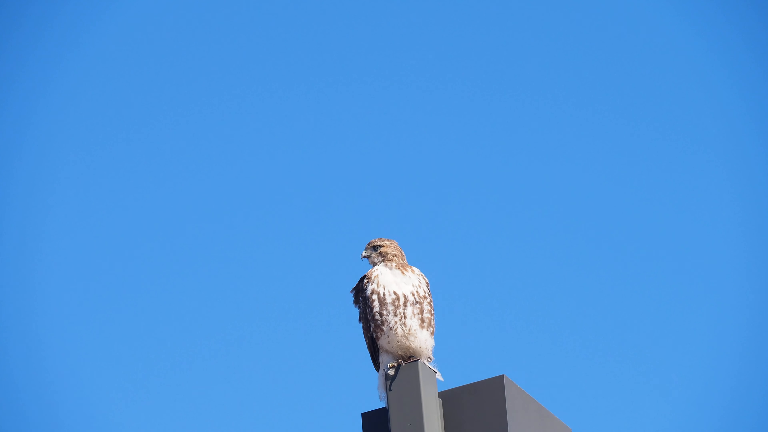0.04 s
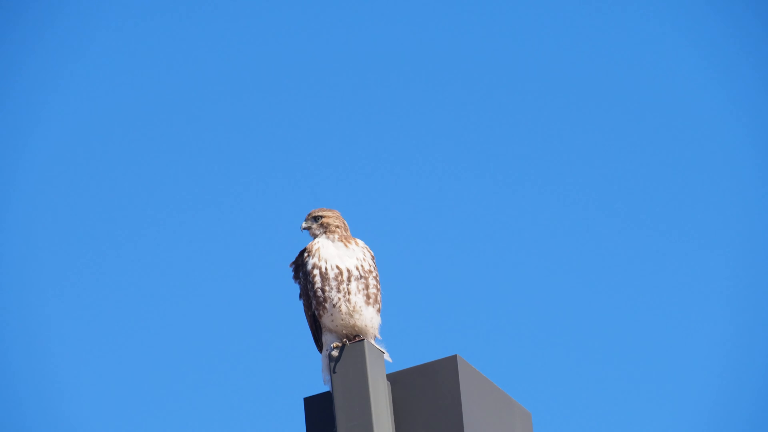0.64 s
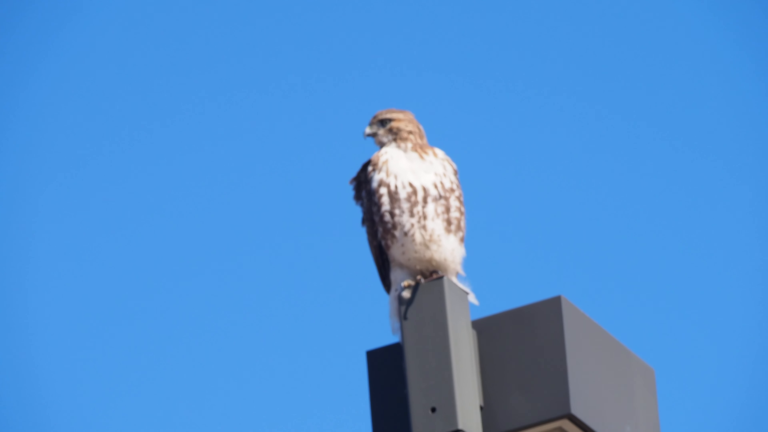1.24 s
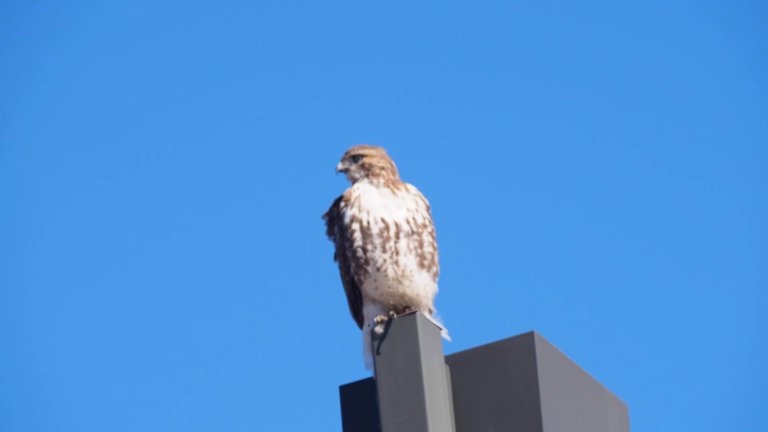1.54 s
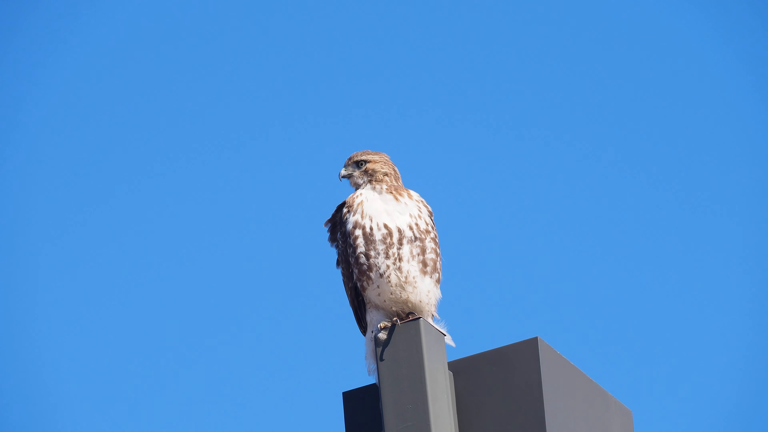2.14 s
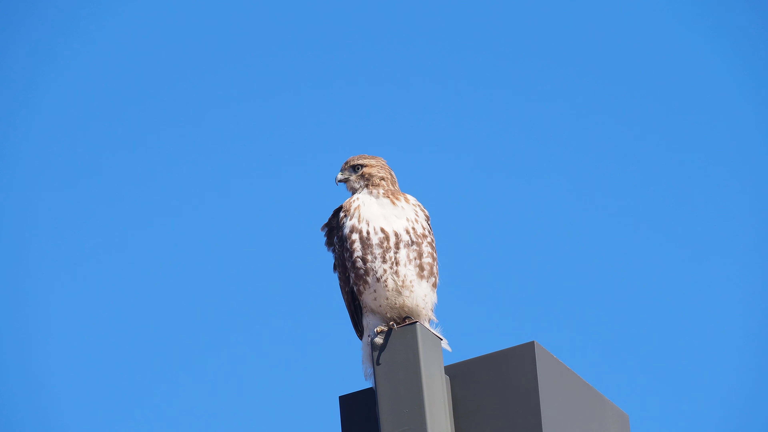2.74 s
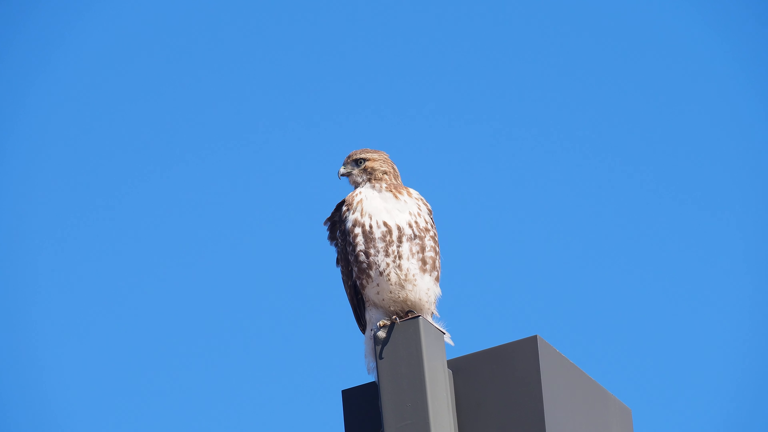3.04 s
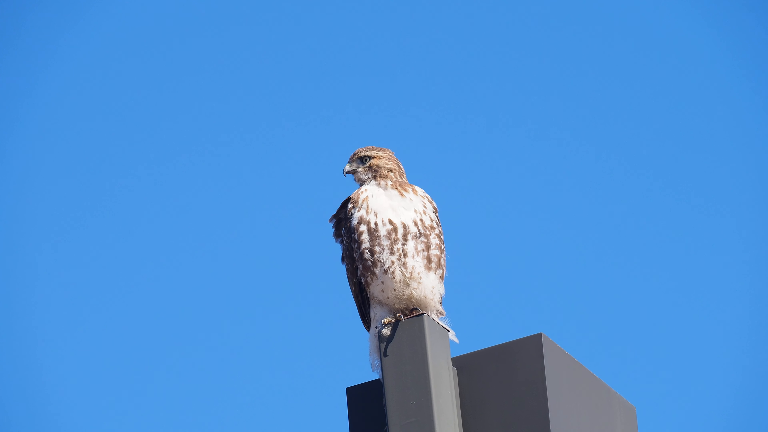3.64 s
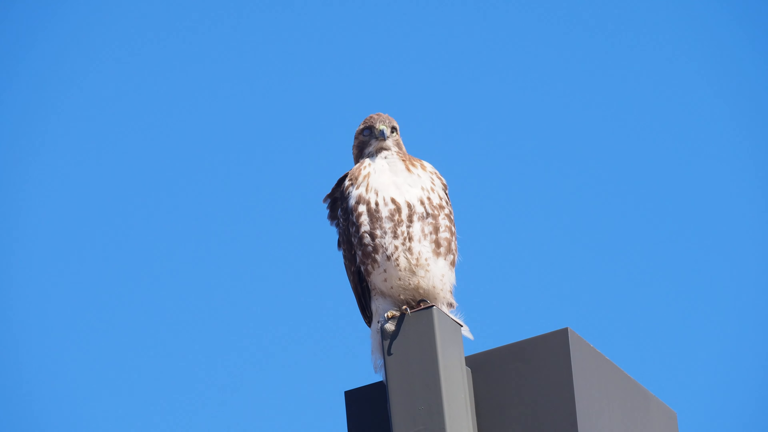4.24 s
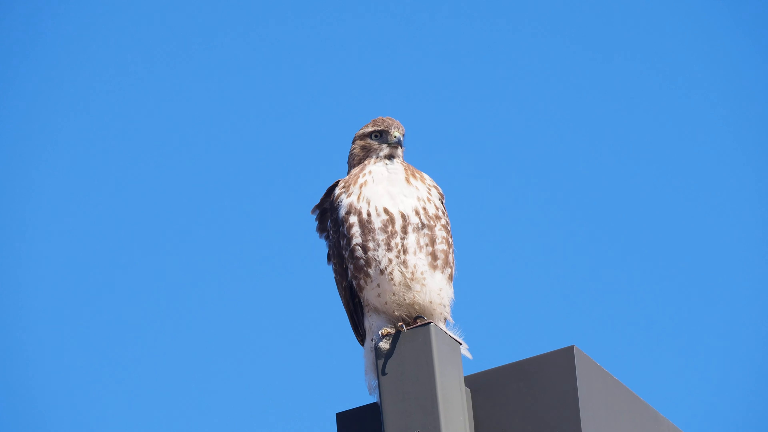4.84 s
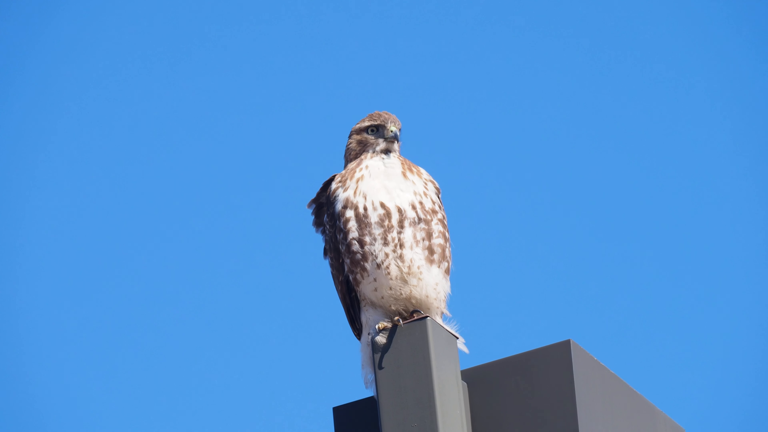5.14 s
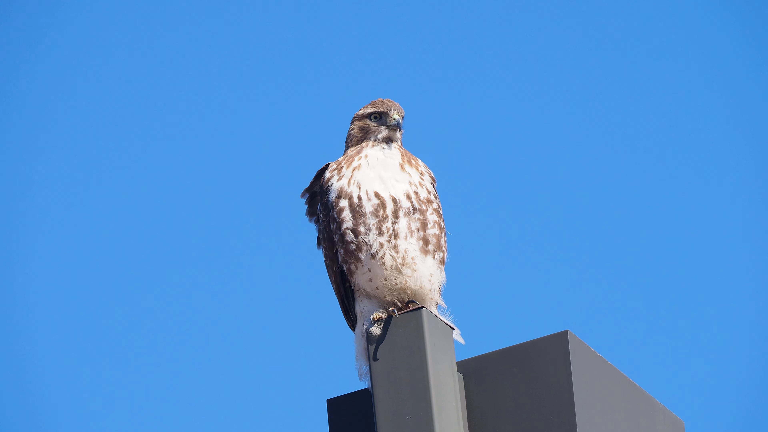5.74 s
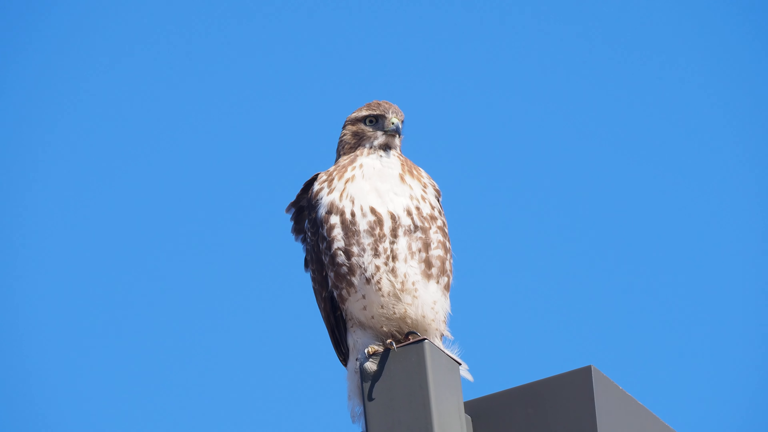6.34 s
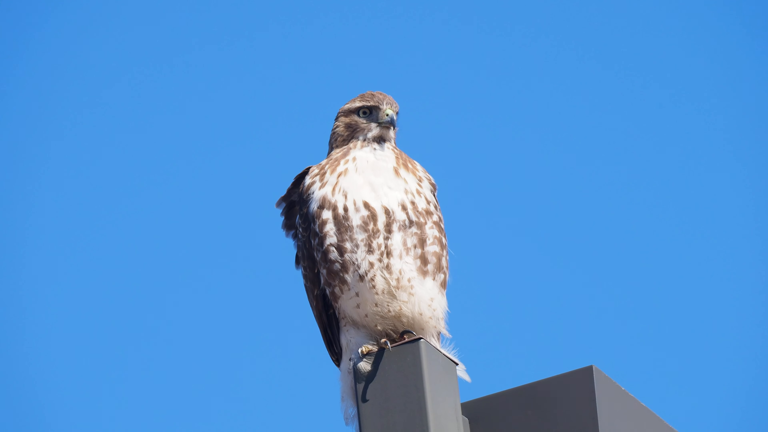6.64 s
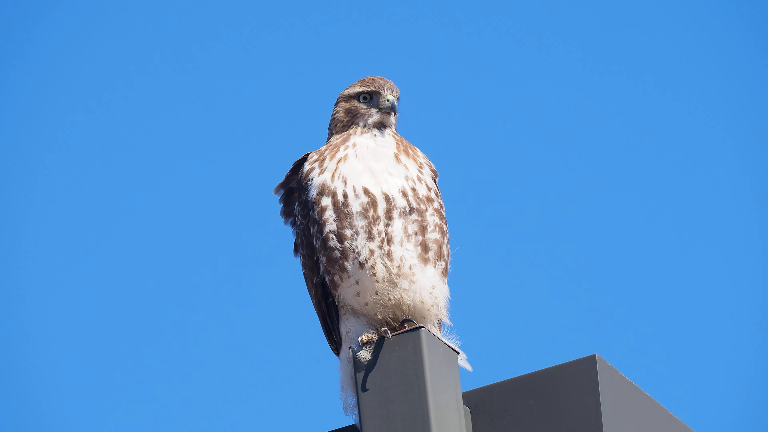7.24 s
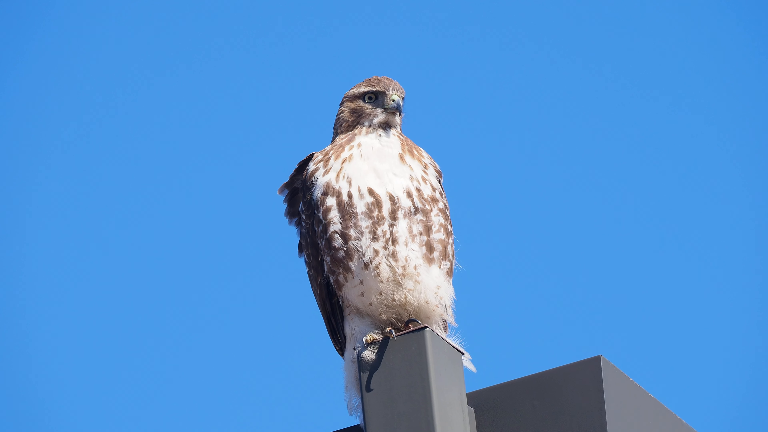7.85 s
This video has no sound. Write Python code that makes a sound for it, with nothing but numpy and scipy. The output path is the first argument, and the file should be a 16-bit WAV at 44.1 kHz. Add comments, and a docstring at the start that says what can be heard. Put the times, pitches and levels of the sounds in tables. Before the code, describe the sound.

Outdoors, wind rumbles and thumps on a camera microphone, mostly on the left. Up close, a zoom barrel slides, clicks and rubs to rest. A hawk some way off to the right gives a raspy yelp that runs into a long, sinking whistle. A small bird twitters faintly on the left, the barrel slides again, and the hawk screams a second time. Far traffic murmurs underneath.

```python
"""Outdoors, far from traffic, wind buffets a camera's stereo microphone, mostly the left port.
First, right at the microphone, the zoom barrel slides, the body clicks and the barrel rubs to rest.
Then a hawk screams from a pole some way off: a rising yelp breaks into a rasp, then a long, sinking
whistle from two membranes. A songbird twitters to the left, the barrel slides again, and a faint
tone comes and goes. Last, the hawk screams a second time."""
import sys
import numpy as np
from scipy import signal
from scipy.fft import rfft, irfft
from scipy.io import wavfile
from scipy.ndimage import uniform_filter1d

SR = 44100
rng = np.random.default_rng(int(sys.argv[2]) if len(sys.argv) > 2 else 0)


def file_out(sig):
    """Save sig as 16-bit WAV at sys.argv[1]."""
    # one column per channel
    cols = np.atleast_2d(sig).T
    # limit, then scale
    lim = np.clip(cols, -1, 1)
    pcm = np.round(lim * 32767).astype(np.int16)
    wavfile.write(sys.argv[1], SR, pcm)


N = 357210
T = np.arange(N) / SR
FREQS = np.maximum(np.arange(N // 2 + 1) * SR / N, 1)


# The yelps that open the screams: start_s, length_s, level_db
YELPS = [(1.782, .205, -53), (7.108, .125, -55)]
# The held notes, one list a scream:
# time_s, pitch_hz, level_db (before gain_db), throat_hz, second_depth, second_pitch_ratio, roughness
HELD_NOTES = [
    [(1.92, 1500, -64, 2800, .8, .5, .4), (2.0, 1528, -54.3, 2250, 1.3, .5, .22),
     (2.07, 1518, -54.8, 2250, 1.2, .5, .13), (2.15, 1485, -56.3, 2400, 1, .5, .17),
     (2.23, 1415, -57, 2600, .6, .5, .26), (2.31, 1372, -56.8, 2750, .65, .5, .2),
     (2.44, 1378, -60, 3550, .5, .5, .12), (2.49, 1372, -59, 3650, .45, .42, .15),
     (2.62, 1348, -58, 3600, .42, .38, .12), (2.78, 1372, -57.5, 3400, .15, .36, .1),
     (2.93, 1342, -59.5, 3200, .08, .36, .1), (3.0, 1255, -61, 2950, .08, .36, .14),
     (3.07, 1215, -59.5, 2650, .08, .36, .2), (3.13, 1140, -63, 2300, .08, .36, .45)],
    [(7.21, 1545, -58, 2300, 1.2, .5, .45), (7.29, 1535, -54.3, 2300, 1, .5, .2),
     (7.38, 1482, -57.3, 2450, .9, .5, .14), (7.47, 1495, -56, 2700, .5, .5, .18),
     (7.56, 1415, -56, 3450, 1.2, .5, .16), (7.68, 1382, -55.3, 3150, .7, .5, .13),
     (7.73, 1397, -59, 3400, .15, .45, .2), (7.79, 1388, -54.8, 3250, .2, .38, .12),
     (7.87, 1368, -58, 3550, .35, .37, .12), (7.97, 1362, -56.7, 3350, .35, .35, .14),
     (8.1, 1375, -58.5, 3300, .12, .35, .12), (8.2, 1365, -59, 3200, .1, .35, .12)],
]
# The camera body's shadow on the port facing away from the hawk: frequency_hz, gain_db
HAWK_SHADE = [(2200, -3), (3000, -3.5), (4000, -6), (5200, -18.5), (9000, -11.5)]

def hawk():
    """On a pole some way off to the right: each scream is a yelp that runs into a held note."""
    screams = sum(yelp(*row) for row in YELPS) + sum(whistle(note) for note in HELD_NOTES)
    return outdoors(screams, "right", lag_s=.000122, shade=HAWK_SHADE, wet_db=-13, decay_s=.5)


# The hawk's wide-open throat in the yelp: frequency_hz, gain_db
YELP_THROAT = [(1000, -24), (1650, -19), (2000, -2), (2300, -4), (2750, -14), (3200, -6), (3700, -2.5),
               (4200, -1.5), (4700, -16), (5150, -9.5), (5500, -16), (6100, -29), (7400, -20), (8200, -25),
               (8750, -13), (9600, -27), (15000, -31)]

def yelp(start_s, length_s, level_db, start_hz=965, top_hz=1075, rasp_hz=990, break_s=.052):
    """A clear note climbs, then breaks into a period-doubled rasp that darkens as the throat closes."""
    source, out = np.zeros((2, N))
    i, t, envelope = span(start_s, length_s + .03, attack_s=.016, release_s=.03)
    climb = np.minimum(t / break_s, 1)
    broken = ramp(t, break_s, break_s + .015)
    hz = (1 - broken) * (start_hz + (top_hz - start_hz) * climb) + broken * rasp_hz
    hz *= 1 + (.013 + .015 * broken) * walk(50)[i]
    roughness = .9 * np.maximum(broken, .4 * climb)
    phase = membrane_phase(hz, roughness, jitter=.06)
    harmonic = np.arange(1, 27)[:, None] / 2
    darkening = undb(-11 * broken * (harmonic > 4) - 7 * (t / length_s) ** 2 * (harmonic > 3.5))
    doubling = np.where(harmonic % 1, broken * undb(-5), 1)  # odd halves sound only in the rasp
    beak_opening = np.where(harmonic > 2, ramp(t, 0, .03), 1)
    partials = darkening * doubling * beak_opening * np.sin(harmonic * phase)
    source[i] = partials.sum(0) * (1 + .7 * roughness * walk(260)[i])
    tiring_db = -.5 - 28 * (t - break_s) + 1.2 * walk(45)[i]
    out[i] = unit(colour(source, YELP_THROAT)[i]) * envelope * undb(level_db + broken * tiring_db)
    return out


# The hawk's beak and throat in the held note: frequency_hz, gain_db
BEAK = [(900, -25), (1400, -3), (2000, 4), (2300, 7), (2800, 7), (3400, 5), (4150, 4.5), (4550, -10),
        (4950, 2), (5400, -1), (6500, -18), (8800, -6), (15000, -35)]

def whistle(note, throat_width_hz=740, gain_db=-1):
    """One membrane sinks as its strain eases; a second, an octave below, adds sidebands, then slips."""
    out = np.zeros(N)
    start_s, end_s = note[0][0], note[-1][0]
    i, _, envelope = span(start_s, end_s - start_s, attack_s=.025, release_s=.035)
    hz, level_db, throat_hz, depth, ratio, roughness = curves(note, T[i])
    hz *= 1 + .005 * walk(45)[i] + .002 * walk(12)[i]
    throat_hz += 80 * walk(18)[i]  # the throat wavers, favouring one partial or another
    depth *= undb(1.3 * walk(25)[i])
    phase = membrane_phase(hz, roughness, jitter=.07)
    second_phase = 2 * np.pi * np.cumsum(ratio * hz) / SR
    slipped = 1 - ramp(ratio, .42, .5)
    harmonic = np.arange(1, 7)[:, None]
    upper = depth * np.select([harmonic == 1, harmonic == 2], [1.05, .8], .22)
    lower = depth * .8 * slipped * np.where(harmonic == 3, 1, .3)
    voice, power = 0, 0
    for side, weight in ((0, 1), (1, upper), (-1, lower)):
        partial_hz = harmonic * hz + side * ratio * hz
        throat = 1 / np.hypot(1, (partial_hz - throat_hz) / throat_width_hz)
        gain = weight * gain_at(BEAK, partial_hz) * throat
        voice += (gain * np.sin(harmonic * phase + side * second_phase)).sum(0)
        power += (gain ** 2).sum(0) / 2
    hoarseness = (1 + 1.2 * roughness * walk(300)[i]) * undb(1.3 * walk(38)[i])
    out[i] = voice / np.sqrt(power) * unit(hoarseness) * envelope * undb(level_db + gain_db)
    return out


def membrane_phase(hz, roughness, jitter):
    """Phase of a membrane whose pitch scatters with roughness."""
    shaken_hz = hz * (1 + jitter * roughness * walk(420)[:len(hz)])
    return 2 * np.pi * np.cumsum(shaken_hz) / SR


# Gusts on the microphone's exposed left port and sheltered right port: time_s, level_db
WIND_LEFT = [(0.0, -24), (1.05, -15), (1.5, -21.0), (1.6, -17.5), (1.8, -19.5), (2.25, -10.5), (2.3, -14.5),
             (2.75, -14.5), (2.9, -18.5), (2.95, -13.5), (3.55, -19.5), (3.8, -15.5), (4.0, -18.5),
             (4.5, -22.5), (4.95, -17.5), (5.25, -18), (5.8, -16), (6.2, -29), (6.3, -22.5), (6.45, -28),
             (6.75, -25), (8.1, -23.5)]
WIND_RIGHT = [(0.0, -36), (1.6, -32), (1.9, -17.5), (2.2, -27.5), (2.3, -34), (4.1, -32), (5.5, -35.5),
              (8.1, -34)]

def wind():
    """Each microphone port has its own gusts and its own eddies."""
    gusts_db = [curves(gusts, T)[0] for gusts in (WIND_LEFT, WIND_RIGHT)]
    return np.array([turbulence(db) + stray_buffets(db) for db in gusts_db])


# Eddies at a port in a moderate gust: frequency_hz, density_db
EDDIES = [(12, -11.5), (25, 6), (55, 5), (100, 2.5), (170, -7.5), (250, -16), (380, -31), (550, -69.5),
          (800, -65), (1400, -70), (3000, -79.5)]

def turbulence(gust_db, moderate_db=-21, db_per_octave=22, flutter_db=3):
    """Faster air at a port is louder and its eddies are smaller, so the rumble reaches higher."""
    flutter = walk(31.1)
    coarse_t = T[::50]
    speed = 2 ** ((gust_db - moderate_db) / db_per_octave + .15 * flutter)[::50]
    spectrum = rfft(rng.standard_normal(N))
    rumble, power = 0, 0
    for hz in 16 * 2 ** (np.arange(15) / 2):  # half-octave bands
        window = np.cos(np.pi / 2 * np.clip(2 * np.log2(FREQS / hz), -1, 1)) ** 2
        gain = gain_at(EDDIES, hz / speed)
        rumble += irfft(spectrum * window, N) * np.interp(T, coarse_t, gain)
        power += gain ** 2 * hz * np.log(2) / SR
    return rumble / np.sqrt(np.interp(T, coarse_t, power)) * undb(gust_db + flutter_db * flutter)


def stray_buffets(gust_db, per_s=12, strong_db=-17, scatter_db=4):
    """Stray eddies strike a port at random, harder as the gust grows, up to a strong wind."""
    out, length = np.zeros(N), SR // 20
    for n, (offset, strength) in enumerate(rng.uniform(-1, 1, (200, 2))):
        at = int((n + 1 + offset) / per_s * SR)
        if at < N - length:
            peak_db = -20 + 3.4 * min(gust_db[at] - strong_db, 0) + scatter_db * strength
            out[at:at + length] += thump(centre_hz=230, rise_s=.0059) * undb(peak_db)
    return out


# Wind hits on the microphone: start_s, peak_db (before gain_db), left_minus_right_db, centre_hz
BUFFETS = [(0.737, -5, 34, 190), (1.043, -6.5, 38, 250), (1.049, -6.5, 40, 264), (1.064, -6.5, 28, 262),
           (1.134, -19.5, 35, 290), (1.184, -24.5, 28, 280), (1.22, -20, 28, 258), (1.246, -13.5, 34, 233),
           (1.398, -18.5, 28, 233), (1.604, -15.5, 31, 257), (1.719, -16.5, 13, 255),
           (1.903, -7.5, -11, 178), (1.946, -12.5, -33, 280), (2.068, -16.5, 26, 250),
           (2.131, -17, 25, 283), (2.349, -13, 23, 199), (2.517, -22.5, 27, 230), (2.748, -5, 38, 164),
           (2.76, -6.5, 40, 204), (2.958, -29, 34, 181), (3.083, -19, 29, 253), (3.681, -14.5, 29, 216),
           (3.776, -13, 38, 300), (3.924, -13.5, 28, 216), (4.927, -19, 28, 184), (4.966, -22.5, 28, 240),
           (5.68, -11.5, 31, 217), (5.762, -10.5, 33, 252), (6.672, -21.5, 18, 146), (6.729, -19, 23, 185),
           (6.911, -20, 22, 162), (7.086, -20, 22, 164), (7.137, -22.5, 27, 169), (7.217, -14, 27, 138),
           (7.251, -22.5, 21, 163), (7.302, -17, 24, 174), (7.435, -17, 25, 140), (7.57, -15, 26, 139),
           (7.598, -24, 23, 164), (7.707, -18.5, 20, 119), (7.909, -20.5, 20, 139), (7.971, -20.5, 18, 145)]

def hard_buffets(gain_db=4):
    """The hardest eddies, each mostly on one port."""
    out = np.zeros((2, N))
    for start_s, peak_db, pan_db, centre_hz in BUFFETS:
        i = int(start_s * SR) + np.arange(SR // 20)
        sides = pan(pan_db) / pan(pan_db).max()
        out[:, i] += sides * undb(peak_db + gain_db) * thump(centre_hz, rise_s=.0075)
    return out


# One eddy striking a port: multiple_of_centre, density_db
THUMP = [(.3, -6), (.75, 2), (1.25, 0), (2, -15), (3, -29), (4.4, -42), (8, -60), (20, -80)]

def thump(centre_hz, rise_s, raggedness=.4):
    """A tight eddy hits a port: a ragged thump of a few cycles, peak 1."""
    t = T[:SR // 20]
    hz = np.maximum(np.fft.rfftfreq(len(t), 1 / SR), 1)
    phase = 2 * np.pi * (rng.random() - hz * rise_s)
    phase += raggedness * np.cumsum(rng.standard_normal(len(hz)))
    pulse = irfft(gain_at(THUMP, hz / centre_hz) * np.exp(1j * phase), len(t))
    pulse *= ramp(t, 0, rise_s) * (1 - ramp(t, rise_s, 4 * rise_s))
    return pulse / abs(pulse).max()


# The hollow zoom barrel and its dust seal, beside the microphone: frequency_hz, density_db
BARREL = [(300, 5.5), (1000, 2), (1800, -0.5), (2300, 0.5), (3000, 0), (3300, 0), (4100, -8.5), (5400, -8),
          (6400, -20), (7400, -14), (8300, -26), (15000, -57)]
SEAL = [(1900, -9.5), (2700, 10), (3400, 6), (5400, 2.5), (6400, 0.5), (7300, 3.5), (8300, -1.5),
        (9000, 0.5), (10000, 3.5), (11300, -8), (13300, 1.5), (16000, -12)]
# Strokes of the barrel: start_s, length_s, attack_s, release_s, level_db, relative_hiss_db
SLIDES = [(-.05, 0.78, .05, 0.5, -58.5, -1), (0.035, 0.19, 0.12, 0.08, -53, 2),
          (0.256, 0.14, 0.04, 0.051, -60, 6.5), (0.483, 0.05, 0.0058, 0.013, -47.5, -9),
          (0.497, 0.27, .015, 0.35, -52.5, -9.5), (0.585, 0.39, 0.17, 0.15, -43, -12),
          (0.775, 0.14, 0.022, 0.087, -47, -8), (0.858, 0.29, 0.034, 0.14, -52.5, -16),
          (2.912, 0.75, 0.23, 0.38, -62.5, -27), (3.929, 0.554, 0.054, 0.13, -53, -12),
          (5.753, 0.44, 0.058, 0.48, -53.5, -18), (6.114, 0.7, 0.1, 0.57, -57.5, -15)]

def zoom_slides(seal_gain_db=-1, grain_db=2):
    """The barrel slides in tiny slips; its dust seal hisses on top."""
    barrel_level, seal_level = np.zeros((2, N))
    for start_s, length_s, attack_s, release_s, level_db, hiss_db in SLIDES:
        i, _, envelope = span(start_s, length_s, attack_s, release_s)
        barrel_level[i] = np.hypot(barrel_level[i], envelope * undb(level_db))
        seal_level[i] = np.hypot(seal_level[i], envelope * undb(level_db + hiss_db + seal_gain_db))
    slips = undb(grain_db * walk(300) + .7 * walk(27))
    barrel = barrel_level * stereo_noise(BARREL, alike=.23, alike_hz=2530)
    seal = seal_level * stereo_noise(SEAL, alike=.12, alike_hz=6150)
    return slips * (barrel + seal)


# The barrel's ring on its first turn: frequency_hz, density_db
SIZZLE_RING = [(2000, -30), (2750, 1), (3300, -9), (3850, 6), (4300, -4), (5500, -30), (9000, -45)]

def zoom_sizzle(level_db=-60):
    """The first turn of the barrel rings a hollow resonance."""
    level = np.zeros(N)
    i, _, envelope = span(start_s=-.03, length_s=.3, attack_s=.03, release_s=.1)
    level[i] = envelope * undb(level_db)
    return level * stereo_noise(SIZZLE_RING, alike=.2, alike_hz=4000)


# Resonances of the rubbing barrel: centre_hz, nominal_width_hz, gain_db
RUB_RINGS = [(1800, 180, -7.5), (2450, 210, -1), (3020, 260, -10.5), (3450, 260, -9), (3950, 130, -10),
             (4900, 200, -8.5), (5350, 260, -11), (7240, 340, -17.5)]
# Pressure of the rub: time_s, level_db
RUB_PRESSURE = [(.8, -78), (.92, -61), (1.07, -57), (1.12, -60), (1.21, -58.5), (1.53, -67), (1.72, -86),
                (1.8, -130)]

def zoom_rub(grain_db=.5, pan_db=3):
    """As the barrel comes to rest, fine slips ring its resonances: a hoarse squeal that dies away."""
    rings = [undb(db) / (1 + ((FREQS - hz) / (.75 * width)) ** 2) for hz, width, db in RUB_RINGS]
    slips = rng.standard_normal((2, N)) * undb(grain_db * walk(120))
    squeal = unit(irfft(rfft(slips) * np.linalg.norm(rings, axis=0), N))
    return pan(pan_db) * squeal * undb(curves(RUB_PRESSURE, T)[0])


# The scrape and the snap of the camera's plastic body: frequency_hz, density_db
SCRAPE = [(200, 8), (600, 8), (1050, 6), (1800, -4), (2750, 3), (3700, -15), (6000, -21), (15000, -36)]
SNAP = [(1500, -10), (4500, -5), (5700, 3), (6800, -4), (10000, -8), (16000, -15)]
# Clicks of the body, right at the microphone:
# start_s, ring_db, ring_hz, ring_ms, scrape_db, scrape_ms, snap_db, left_minus_right_db
CLICKS = [(.4924, -26, 2800, .22, -37, 3, -28, -1), (.5083, -22.5, 900, .55, -27.5, 5, -33, -2),
          (.5122, -27, 2620, .45, -46, 3, -50, -6), (.6672, -24, 2750, .4, -31, 14, -70, 4),
          (6.4016, -23, 2720, .45, -66, 4, -70, 4)]
# Faint dry ticks, to the left: start_s, level_db (before tick_gain_db)
TICKS = [(2.53, -54), (3.0036, -48.5), (4.559, -47), (5.7702, -50)]

def camera_clicks(snap_s=.0012, tick_s=.00082, tick_gain_db=-2, tick_pan_db=10):
    """Each click snaps, rings the plastic for a few cycles and scrapes briefly; small ticks only snap."""
    out, t = np.zeros((2, N)), T[:SR // 10]
    scrape_noise = stereo_noise(SCRAPE, alike=1, alike_hz=2010)
    snap_noise = stereo_noise(SNAP, alike=.13, alike_hz=8900)
    tick_noise = stereo_noise(SEAL, alike=.4, alike_hz=8900)
    port_lag_s = np.array([[0], [.00005]])
    for start_s, ring_db, ring_hz, ring_ms, scrape_db, scrape_ms, snap_db, pan_db in CLICKS:
        i = int(start_s * SR) + np.arange(len(t))
        age = t * 1000 / ring_ms
        ring = (age / 2) ** 2 * np.exp(2 - age) * np.sin(2 * np.pi * ring_hz * (t - port_lag_s))
        scrape = scrape_noise[:, i] * np.exp(-t * 1000 / scrape_ms)
        snap = snap_noise[:, i] * t / snap_s * np.exp(1 - 2 * t / snap_s)
        out[:, i] += pan(pan_db) * (undb(ring_db) * ring + undb(scrape_db) * scrape + undb(snap_db) * snap)
    for start_s, level_db in TICKS:
        i = int(start_s * SR) + np.arange(len(t))
        tick = tick_noise[:, i] * np.exp(-t / tick_s)
        out[:, i] += pan(tick_pan_db) * undb(level_db + tick_gain_db) * tick
    return out


# The songbird's notes: start_s, length_s, start_hz, end_hz, level_db (before gain_db), burr_ratio
CHIRPS = [(2.76, .08, 3700, 3350, -66, .02), (2.83, .08, 3600, 3650, -67, .015),
          (2.955, .05, 2850, 3400, -64.5, .02), (3.03, .08, 2700, 3300, -64, .08),
          (3.1, .035, 4150, 3400, -64, .012), (3.12, .035, 3200, 3350, -61, .02),
          (3.15, .05, 2900, 2600, -67, .09), (3.195, .05, 2800, 3400, -62, .018),
          (3.235, .05, 3600, 2800, -65, .09), (3.275, .06, 3100, 3050, -64.5, .07),
          (3.41, .06, 3200, 3850, -65, .015), (3.53, .05, 3900, 3500, -65, .025),
          (3.57, .05, 2750, 3050, -64, .02), (3.615, .05, 3300, 2450, -59, .012),
          (3.785, .035, 3500, 3750, -66, .03), (3.815, .035, 3400, 2900, -64, .03),
          (4.56, .06, 3900, 4200, -68, .03), (4.75, .05, 3950, 3400, -66, .035),
          (4.91, .06, 3400, 3800, -68, .035)]
# The camera body's shadow on the port facing away from the songbird: frequency_hz, gain_db
SONGBIRD_SHADE = [(2200, -4), (4000, -5)]

def songbird(gain_db=4):
    """Off to the left, a small bird twitters in short glides, some clear and some burry."""
    song = np.zeros(N)
    for start_s, length_s, start_hz, end_hz, level_db, burr in CHIRPS:
        progress = np.linspace(0, 1, int(length_s * SR))
        scatter = unit(uniform_filter1d(rng.standard_normal(SR), size=60))[:len(progress)]
        hz = (start_hz + (end_hz - start_hz) * progress) * (1 + burr * scatter)
        chirp = np.sqrt(2) * np.sin(np.pi * progress) * np.sin(2 * np.pi * np.cumsum(hz) / SR)
        song[int(start_s * SR):][:len(chirp)] += undb(level_db + gain_db) * chirp
    return outdoors(song, "left", lag_s=.0001, shade=SONGBIRD_SHADE, wet_db=-10, decay_s=.7)


# Distant roads and the hiss above them: frequency_hz, density_db
TRAFFIC = [(30, -6), (130, 1.5), (250, 12), (480, 4), (640, 8), (800, 2), (1020, 4), (1400, -1.5),
           (1850, -14), (2700, -11), (3500, -15.5), (4500, -20.5), (10000, -22), (16000, -26.5)]

def traffic(level_db=-52):
    """Far roads murmur under a hiss; the level wavers slightly."""
    return stereo_noise(TRAFFIC, alike=.78, alike_hz=2100) * undb(level_db + .33 * walk(11))


def whine(pitch_hz=3447, level_db=-77):
    """A faint, thin tone of steady pitch in the background."""
    out = np.zeros(N)
    i, t, envelope = span(start_s=4.5, length_s=2.5, attack_s=.3, release_s=.3)
    out[i] = envelope * undb(level_db + 2 * walk(6)[i]) * np.sin(2 * np.pi * pitch_hz * t)
    return out


def outdoors(call, near_side, lag_s, shade, wet_db, decay_s):
    """A call reaches the far port later and duller; ground and buildings add a thin scatter."""
    far = irfft(rfft(call) * gain_at(shade, FREQS) * np.exp(-2j * np.pi * FREQS * lag_s), N)
    direct = np.array([call, far] if near_side == "left" else [far, call])
    t = T[:SR]
    tail = rng.standard_normal((2, SR)) * undb(-60 * t / decay_s) * (t > .006)
    tail /= np.sqrt((tail ** 2).sum(1, keepdims=True))
    return direct + undb(wet_db) * signal.fftconvolve(call[None], tail, axes=1)[:, :N]


def undb(db):
    """Decibels to gain."""
    return 10 ** (np.asarray(db) / 20)


def unit(x):
    """Scale to rms 1."""
    return x / np.sqrt(np.mean(x ** 2))


def curves(rows, t):
    """Each column of a table, joined by straight lines in time."""
    times, *columns = np.transpose(rows)
    return [np.interp(t, times, column) for column in columns]


def gain_at(spectrum, hz):
    """Gain of a (frequency_hz, gain_db) spectrum at hz."""
    points_hz, db = np.transpose(spectrum)
    return undb(np.interp(np.log(hz), np.log(points_hz), db))


def colour(x, spectrum):
    """Give a sound a spectrum, at rms 1."""
    return unit(irfft(rfft(x) * gain_at(spectrum, FREQS), N))


def walk(rate_hz):
    """A smooth random drift that changes about rate_hz times a second, at rms 1."""
    return unit(irfft(rfft(rng.standard_normal(N)) * np.exp(-(FREQS / rate_hz) ** 2), N))


def pan(db):
    """Left and right gains for a level difference."""
    return undb(np.array([[db], [-db]]) / 2)


def stereo_noise(spectrum, alike, alike_hz):
    """Coloured noise whose two sides grow unrelated above alike_hz."""
    coherence = alike / (1 + (FREQS / alike_hz) ** 2)
    mid, side = rfft(rng.standard_normal((2, N)))
    ports = mid * np.sqrt(1 + coherence) + side * np.sqrt(1 - coherence) * np.array([[1], [-1]])
    return colour(irfft(ports, N), spectrum)


def ramp(t, start, end):
    """A smooth step from 0 to 1."""
    return np.sin(np.pi / 2 * np.clip((t - start) / (end - start), 0, 1)) ** 2


def span(start_s, length_s, attack_s, release_s):
    """The samples of an event, the time since its start, and its attack-hold-release envelope."""
    i = np.flatnonzero((T >= start_s) & (T < start_s + length_s))
    t = T[i] - start_s
    return i, t, ramp(t, 0, attack_s) * (1 - ramp(t, length_s - release_s, length_s))


def scene():
    """Birds to either side, wind and handling at the microphone, traffic far behind."""
    birds = hawk() + songbird()
    air = wind() + hard_buffets()
    handling = zoom_slides() + zoom_sizzle() + zoom_rub() + camera_clicks()
    return birds + air + handling + whine() + traffic()


def record(dry):
    """The camera rounds the hardest gusts and cuts the top."""
    ceiling, top_hz = .9, 15800
    lowpass = signal.ellip(8, .2, 70, top_hz, fs=SR, output="sos")
    return signal.sosfilt(lowpass, ceiling * np.tanh(dry / ceiling))


dry = scene()
out = record(dry)
file_out(out)
```